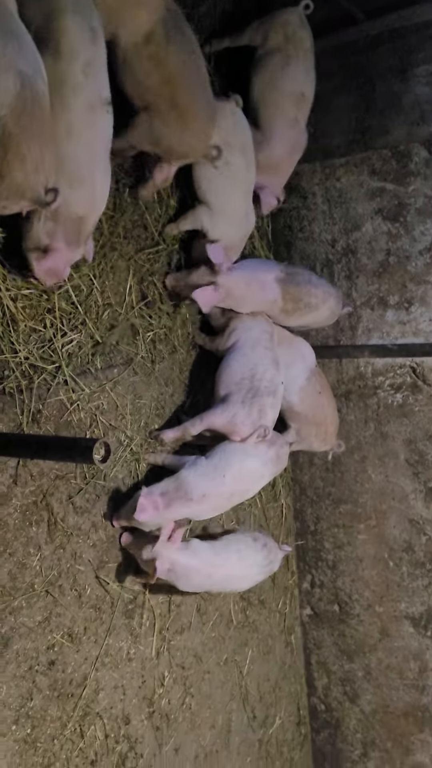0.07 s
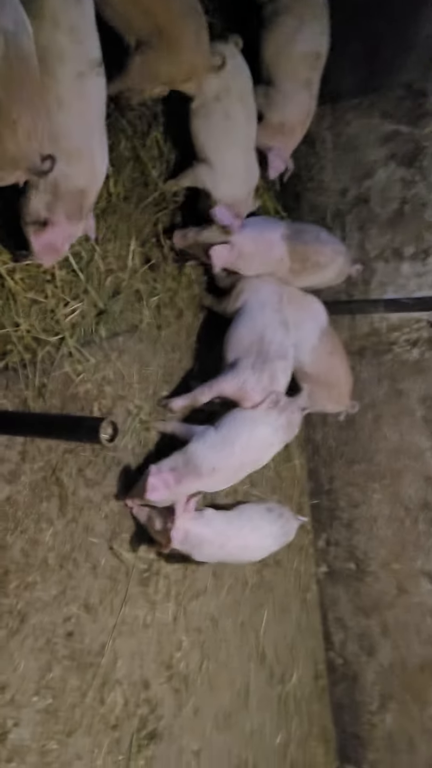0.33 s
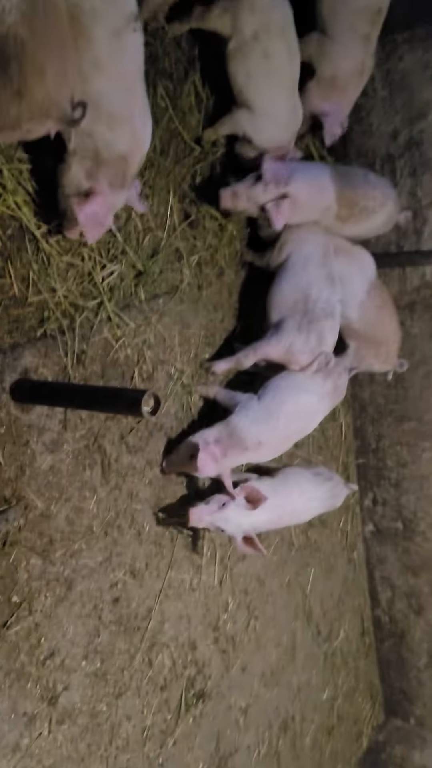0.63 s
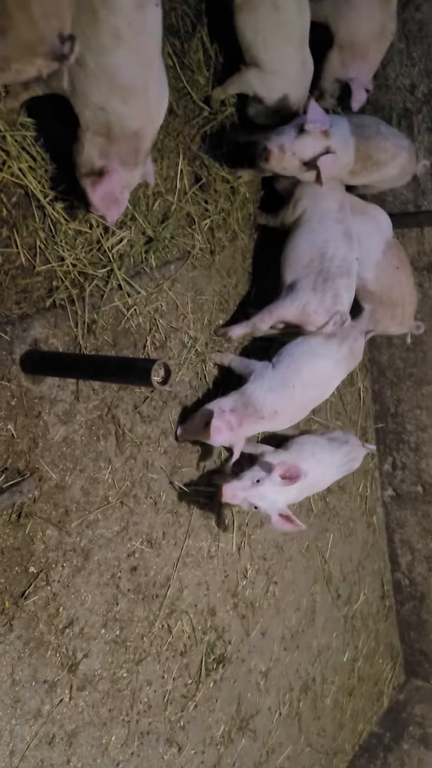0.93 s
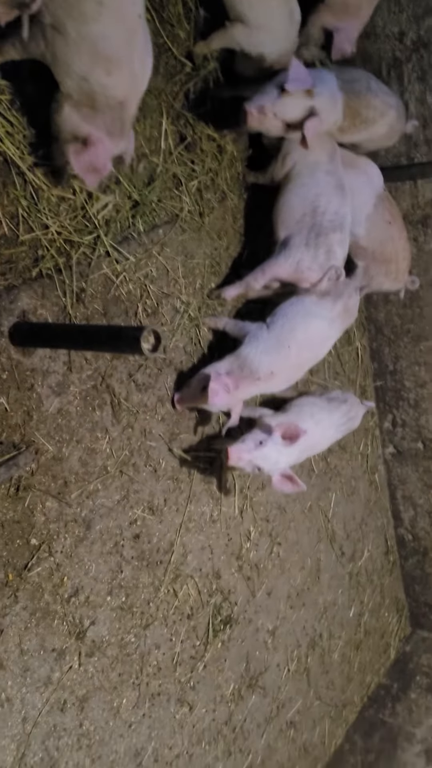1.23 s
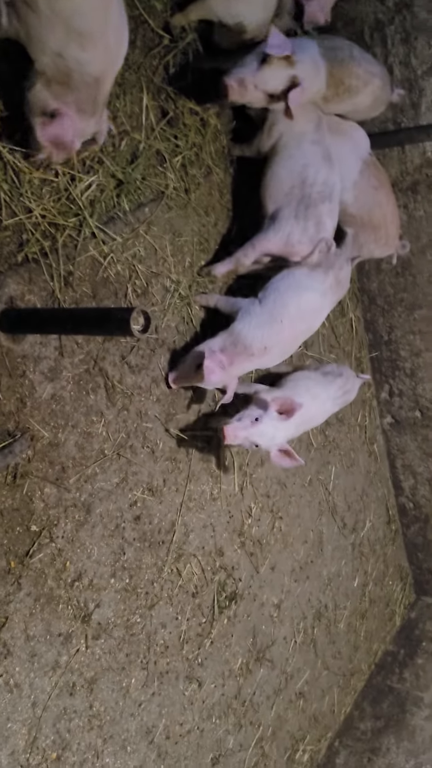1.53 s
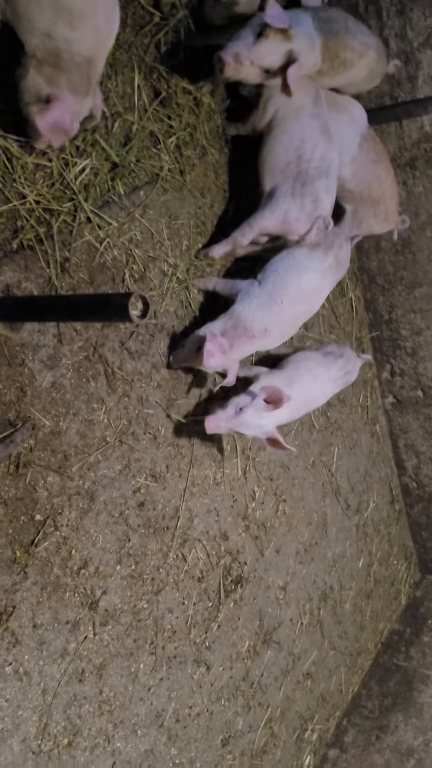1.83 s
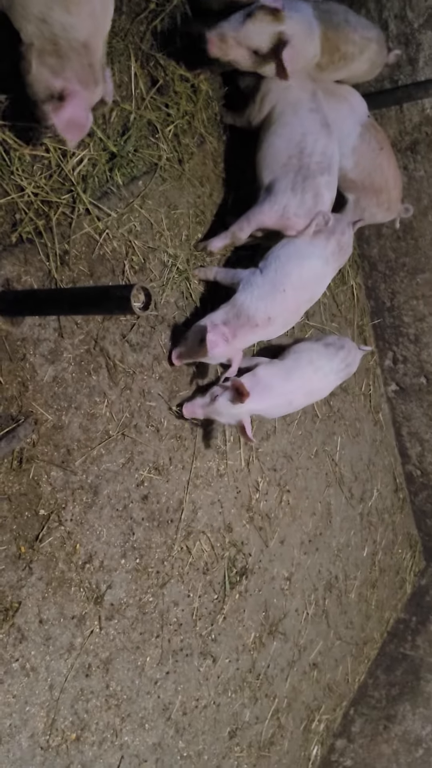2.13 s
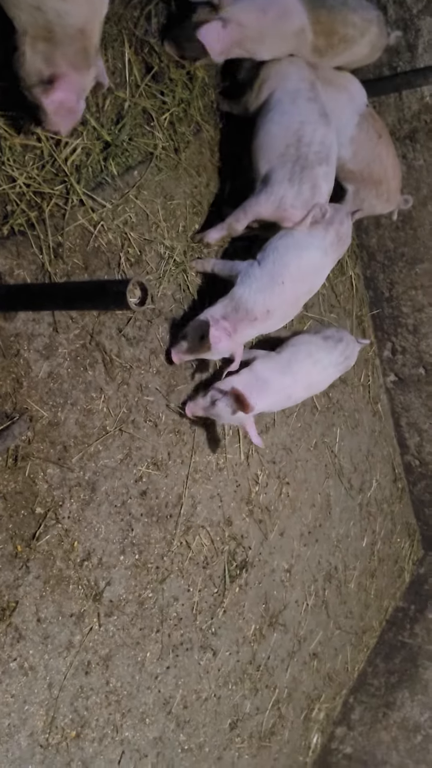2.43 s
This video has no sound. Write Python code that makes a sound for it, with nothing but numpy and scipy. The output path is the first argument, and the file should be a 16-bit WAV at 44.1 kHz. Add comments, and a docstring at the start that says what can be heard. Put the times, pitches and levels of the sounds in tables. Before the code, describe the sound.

Piglets smack their mouths and chew, with faint straw rustling, soft snuffles and a couple of quiet grunts in a concrete pen.

```python
"""In a small concrete pen, piglets doze and root in straw over the faint air noise of a shed.
Wet smacks and chewing excite damped resonances of the mouth; breath drives the nostrils in snuffles,
and pulses from the throat ring the snout in grunts. Stalks fracture, hides rub, and bodies and hooves
bump the floor. The hard walls return these sounds as early reflections and a short reverberation."""
import sys
import numpy as np
from scipy import signal
from scipy.fft import rfft, irfft
from scipy.io import wavfile
from scipy.ndimage import uniform_filter1d

SR = 44100
rng = np.random.default_rng(int(sys.argv[2]) if len(sys.argv) > 2 else 0)


def unload_wav(signal):
    """Save mono or channel-first audio to the path in sys.argv[1] as 16-bit WAV at rate SR, clipped to [-1, 1]."""
    wavfile.write(
        sys.argv[1],
        SR,
        np.round(np.clip(np.atleast_2d(signal).T, -1, 1) * 32767).astype(np.int16),
    )


N = 308259
TIME = np.arange(N) / SR
EVENT_TIME = np.arange(4096) / SR


def undb(db):
    """Decibels to amplitude ratio. Table levels are relative: each source adds its own gain."""
    return 10 ** (np.asarray(db) / 20)

def unit(x):
    """Normalisation to rms 1."""
    return x / np.sqrt(np.mean(x ** 2))

def burst(x):
    """Normalisation of a transient to the energy of 3 ms at rms 1."""
    return x * np.sqrt(.003 * SR / np.sum(x ** 2))

def add(track, s, x):
    """Superposition of x on the track from time s."""
    i = max(int(s * SR), 0)
    track[..., i:i + x.shape[-1]] += x[..., :N - i]

def at_hz(points, hz):
    """Interpolation of (frequency [Hz], value) points on a logarithmic frequency axis."""
    f, v = np.transpose(points)
    return np.interp(np.log(np.maximum(hz, 1)), np.log(f), v)

def colour(x, points):
    """Minimum-phase filter through (frequency [Hz], gain [dB]) points."""
    gain = undb(at_hz(points, np.linspace(0, SR / 2, 2049)))
    cepstrum = irfft(np.log(gain))
    half = len(cepstrum) // 2
    causal = np.r_[cepstrum[0], 2 * cepstrum[1:half], np.zeros(half)]
    return signal.oaconvolve(x, irfft(np.exp(rfft(causal))))[:len(x)]

def resonate(x, hz, width_hz):
    """Second-order resonance with unit gain at its centre."""
    return signal.lfilter(*signal.iirpeak(hz, hz / np.clip(width_hz, 10, 9000), fs=SR), x)

def walk(rate_hz):
    """Random modulation: interpolated Gaussian values with a spread near 1."""
    knots = rng.standard_normal(int(N / SR * rate_hz) + 2)
    return np.interp(TIME * rate_hz, np.arange(len(knots)), knots)

def pan(db):
    """Left and right gains for a level difference, left minus right."""
    return undb(np.array([[db], [-db]]) / 2)

def envelope(s, length_s, attack_s, release_s):
    """Linear attack from time s, then exponential decay once the length is over."""
    attack = np.clip((TIME - s) / attack_s, 0, 1)
    return attack * np.exp(-np.maximum(TIME - s - length_s, 0) / release_s)

def hump(s, half_s):
    """Gaussian rise and fall around time s."""
    return np.exp(-((TIME - s) / half_s) ** 2)

def grains(per_s=2500, spread_db=4.5):
    """Shot noise: many tiny stalk clicks, a few of them much larger."""
    sizes = undb(spread_db * np.minimum(rng.exponential(size=N), 4)) * rng.choice([-1, 1], N)
    return (rng.random(N) < per_s / SR) * sizes

def crackle(decay_s, impulse=0.46):
    """Rupture: one impulse and an exponentially dying spray of smaller ones."""
    spray = rng.standard_normal(len(EVENT_TIME)) * np.exp(-EVENT_TIME / decay_s)
    return spray + impulse * np.sqrt(np.sum(spray ** 2)) * (EVENT_TIME == 0)

def pop(hz, width_hz, rise_s=0.0027):
    """Damped oscillator, radiating as the rate of change of its flow."""
    ring = np.sin(2 * np.pi * hz * EVENT_TIME) * np.exp(-np.pi * width_hz * EVENT_TIME)
    onset = 1 - np.exp(-EVENT_TIME / rise_s)
    return burst(np.gradient(ring * onset))

def faint(typical, per_s, spread=0.035):
    """Jittered sequence: one event row in each time slot, scattered about the typical values."""
    chance = rng.uniform(-1, 1, (64, 1 + len(typical)))[:int(N / SR * per_s)]
    return [((slot + (1 + c[0]) / 2) / per_s, *(np.array(typical) * (1 + spread * c[1:])))
            for slot, c in enumerate(chance)]


# air noise spectrum: (frequency [Hz], level [dB])
SHED_SPECTRUM = [(25, -36), (120, -11.5), (260, -5.5), (350, 2.5), (460, 1), (620, -7.5), (900, -8.5),
                 (1500, -18), (2150, -6.5), (2700, -14), (4900, -17.5), (7500, -18.5), (8700, -29),
                 (16000, -16)]

def shed(level_db=-54, coherent_hz=900, waver_db=1):
    """Diffuse air noise: long wavelengths reach both sides alike."""
    mid, side = (colour(rng.standard_normal(N), SHED_SPECTRUM) for _ in range(2))
    side = signal.sosfilt(signal.butter(1, coherent_hz, "high", fs=SR, output="sos"), side)
    return unit(mid + side * np.array([[1], [-1]])) * undb(level_db + waver_db * walk(rate_hz=9.1))


# spectra of crackling straw, swept straw and rubbing hides: (frequency [Hz], level [dB])
STRAW_SPECTRUM = [(400, -6.5), (1000, 7), (2200, 11), (3200, -5), (5000, 6), (7000, -9), (8700, -6.5),
                  (11000, 5), (16000, 1)]
SWISH_SPECTRUM = [(800, -9), (2200, 3.5), (3200, -4), (5000, 0.5), (7000, -2), (8700, -4.5), (11000, 3.5),
                  (16000, -2.5)]
HIDE_SPECTRUM = [(25, -16), (60, -7.5), (120, -4.5), (170, 0.5), (300, 0.5), (480, -2), (900, -6.5),
                 (2000, -62.5)]
# body movements: (centre time [s], half length [s], straw level [dB], hide level [dB])
STIRS = [(0.122, 0.19, -56, -61), (.46, 0.4, -55, -55), (0.98, 0.074, -51, -66), (1.47, 0.4, -55.5, -60.5),
         (2.227, 0.01, -48, -56), (2.386, 0.059, -50.5, -55), (2.4, 0.31, -56.5, -61),
         (3.31, 0.16, -64, -57.5), (3.63, .05, -57, -74), (4.088, 0.27, -56, -68), (4.457, 0.053, -47, -71),
         (4.734, 0.08, -49.5, -57.5), (4.904, 0.11, -54.5, -64), (5.184, 0.042, -50, -58),
         (5.525, 0.1, -53, -48), (6.22, 0.34, -57, -63), (6.654, 0.48, -59, -70)]

def bedding(rest_straw_db=-65.5, rest_hide_db=-65, swish_half_s=0.052):
    """Friction noises add in power: hides rub, and straw crackles in slow stirs, swishes in quick ones."""
    slow, quick, rubbing = undb(rest_straw_db) ** 2, 0, undb(rest_hide_db) ** 2
    for s, half_s, straw_db, hide_db in STIRS:
        motion = hump(s, half_s)
        quickness = 1 / (1 + (half_s / swish_half_s) ** 4)
        straw_power = (undb(straw_db) * motion) ** 2
        slow += (1 - quickness) * straw_power
        quick += quickness * straw_power
        rubbing += (undb(hide_db) * motion) ** 2
    catches = undb(2.5 * walk(rate_hz=28))
    straw = unit(colour(grains(), STRAW_SPECTRUM)) * np.sqrt(slow) * catches
    swish = unit(colour(grains(), SWISH_SPECTRUM)) * np.sqrt(quick)
    slips = undb(2 * walk(rate_hz=14))
    hides = unit(colour(rng.standard_normal(N), HIDE_SPECTRUM)) * np.sqrt(rubbing) * slips
    return (straw + swish) * undb(-3.5), hides * undb(-6)


# breath spectrum: (frequency [Hz], level [dB])
BREATH_SPECTRUM = [(120, -3), (330, 2.5), (900, -1), (2000, -8.5), (5000, -12)]
# breaths: (time [s], level [dB], length [s], nostril resonance [Hz], bandwidth [Hz])
SNUFFLES = [(-.025, -36, 0.023, 660, 163), (3.79, -47.5, .07, 477, 700), (3.9, -44, 0.1, 500, 650),
            (4.861, -41.5, 0.083, 610, 640)]

def snuffles(flutter_db=3):
    """Turbulent breath excites the resonance of fluttering nostrils."""
    out = np.zeros(N)
    for s, db, length_s, hz, width_hz in SNUFFLES:
        air = rng.standard_normal(N) * undb(flutter_db * walk(rate_hz=90))
        breath = unit(colour(resonate(air, hz, width_hz), BREATH_SPECTRUM))
        out += breath * undb(db) * envelope(s, length_s, attack_s=0.0083, release_s=0.023)
    return out * undb(-4.5)


# rupture spectrum of saliva and stalks: (frequency [Hz], level [dB])
CRACK_SPECTRUM = [(550, -15), (950, 8), (2200, 4), (3000, -2), (4000, 0.5), (5200, -1), (7000, 0.5),
                  (8500, -5), (16000, -58)]
# soft bites: (time [s], level [dB], cavity resonance [Hz], wet crack level [dB], decay time [s])
CHEWS = [(0.065, -40.5, 2280, -29, 0.0022), (.326, -36.5, 2100, -11, 0.0078),
         (.33, -33.5, 1190, -20, 0.0076), (0.489, -44, 1480, -24, 0.0073),
         (1.117, -41.5, 2650, -27, 0.00092), (1.603, -41.5, 2110, -20, 0.0034),
         (1.641, -43, 1600, -18, .0042), (1.868, -41.5, 2020, -7, 0.0021), (2.353, -37.5, 2180, -7, .008),
         (2.621, -44.5, 2150, -5, 0.0017), (2.663, -42.5, 1210, -24, 0.0058),
         (3.12, -45, 1150, -21, 0.0042), (3.595, -43, 1290, -11, 0.0045), (3.669, -44, 1780, -9, .004),
         (3.807, -41.5, 1940, -13, 0.0072), (3.869, -40.5, 1850, -17, 0.0017),
         (4.511, -36.5, 1520, -14, 0.0036), (4.571, -35, 2000, -13, 0.0026),
         (4.832, -40, 1410, -12, 0.0043), (5.037, -45.5, 2010, -22, 0.0023),
         (5.254, -40.5, 1760, -12, 0.0046), (5.687, -37, 1510, -10, 0.0056), (5.776, -43, 1540, -1.5, .003),
         (6.1, -40.5, 1370, -20, 0.0029), (6.136, -33, 1250, -21, 0.0037),
         (6.174, -30.5, 1310, -30, 0.0046), (6.234, -37.5, 1820, -5, 0.0044),
         (6.828, -38.5, 1650, -12.5, 0.0023)]

def chews():
    """Forced resonance: a ragged spray of wet clicks drives the mouth cavity; long bites build slowly."""
    out = np.zeros(N)
    for s, db, hz, crack_db, decay_s in CHEWS + faint((-49.5, 2000, -1, 0.02), per_s=2.2):
        decay_s = np.clip(decay_s, .001, .02)
        ragged = np.repeat(undb(9.2 * rng.standard_normal(len(EVENT_TIME) // 64)), 64)
        onset = 1 - np.exp(-EVENT_TIME / (0.44 * decay_s))
        spray = crackle(decay_s, impulse=0) * ragged * onset
        mouth = burst(resonate(resonate(spray, hz, width_hz=260), hz, width_hz=2500))
        crack = burst(colour(spray, CRACK_SPECTRUM))
        add(out, s, undb(db - 4.5) * (mouth + undb(crack_db + 3) * crack))
    return out


# bodies and hooves landing: (time [s], level [dB], frequency [Hz])
BUMPS = [(0.149, -37, 104), (.359, -38, 237), (.407, -31, 118), (.58, -32.5, 290), (.62, -31, 266),
         (2.378, -35.5, 264), (4.323, -32.5, 183), (4.475, -37, 110), (4.519, -42, 150), (5.268, -34, 64.6),
         (5.398, -30.5, 72.7), (5.439, -36, 61.9), (5.499, -40, 237)]

def bumps():
    """Soft impacts on concrete excite a low, heavily damped oscillation."""
    out = np.zeros(N)
    for s, db, hz in BUMPS:
        add(out, s, undb(db - 10.5) * pop(hz, width_hz=80))
    return out

def rumble(bump_gain=0.33 * undb(-14.5), rest_db=-82):
    """Amplitude modulation: low noise, uncorrelated between the sides, swells with every bump."""
    swells = sum(undb(db) * hump(s, half_s=0.042) for s, db, _ in BUMPS)
    spectrum = [(20, -34), (45, -17), (75, -10.5), (130, -20), (300, -25), (900, -67)]
    sides = np.array([unit(colour(rng.standard_normal(N), spectrum)) for _ in range(2)])
    return sides * (bump_gain * swells + undb(rest_db))


# fizz spectrum of the finest ruptures: (frequency [Hz], level [dB])
FIZZ_SPECTRUM = [(4000, -34), (8500, -2.5), (10500, 13), (13000, 10), (16000, 5.5)]
# breaking straws: (time [s], level [dB], fizz level [dB])
SNAPS = [(0.244, -34, -30), (.456, -38.5, -25), (1.505, -38, -25), (2.029, -31.5, -11.5),
         (2.101, -41.5, -9), (2.799, -39.5, -8), (2.938, -40.5, -15), (3.28, -40, -18), (4.3245, -31, -4.5),
         (5.1022, -40, -5), (5.492, -36, -9.5), (6.335, -40, -9)]

def snaps(stalk_hz=5000, width_hz=4900):
    """Brittle fracture excites the broad resonance of a dry stalk, with a bright fizz."""
    out = np.zeros(N)
    for s, db, fizz_db in SNAPS + faint((-49, -4), per_s=3.6):
        fracture = colour(crackle(decay_s=0.0053), CRACK_SPECTRUM)
        stalk = burst(resonate(fracture, stalk_hz, width_hz))
        fizz = burst(colour(crackle(decay_s=0.0015), FIZZ_SPECTRUM))
        add(out, s, undb(db) * (undb(-10.5) * stalk + undb(fizz_db) * fizz))
    return out


# mouth smacks: (time [s], level [dB], main cavity [Hz], bandwidth [Hz], second cavity [Hz],
# wet crack level [dB], crack cutoff [Hz], fizz level [dB], jaw thump level [dB],
# left minus right [dB], direct sound level [dB])
SMACKS = [(.560, -31.5, 2200, 1180, 1040, -1, 6400, -12, -3, 15, 0.5),
          (.680, -17.5, 1134, 380, 2060, 2, 6800, -10.5, -29, 6, 3),
          (.970, -28, 1424, 354, 1840, -6.5, 7100, -5, -17.5, 11, 2),
          (1.376, -37, 1220, 400, 2160, 6, 4760, -6, -9, 4, 5.5),
          (3.3084, -15.5, 1936, 268, 1950, -13, 7200, -18, -27, -3.5, 7.5),
          (3.3893, -19.5, 1600, 254, 1830, -3.5, 5060, -13.5, -25, -1, 6.5),
          (4.203, -27.5, 1170, 397, 2070, 8, 9700, 4, -3, -0.5, 5.5),
          (5.325, -29, 1890, 500, 904, 1, 6500, -12, -1, 1, 4.5),
          (5.452, -33, 1370, 180, 1870, -2.5, 6700, -9, -20, -6, 3.5),
          (5.716, -22, 1460, 249, 1760, -8.5, 7500, -17, -20.5, 2, -0.5),
          (5.850, -16.5, 1770, 520, 1460, -4, 4800, -19, -13, -.5, 5),
          (6.43, -17, 1064, 300, 1305, -4.5, 5800, -33, -29, -1, -4.5),
          (6.747, -33, 1346, 397, 1080, -2, 6730, -8.5, -14, -2, 5),
          (6.89, -30.5, 933, 218, 2790, -4, 5530, -26, -13, -2, 5)]

def smacks():
    """Free oscillation of two mouth cavities as tongue and lips part; saliva cracks, the jaw thumps."""
    out = np.zeros((2, N))
    for (s, db, hz, width_hz, second_hz, crack_db, cutoff_hz,
         fizz_db, thump_db, pan_db, direct_db) in SMACKS:
        cavities = pop(hz, width_hz) + undb(-4.5) * pop(second_hz, width_hz=360)
        wet = signal.sosfilt(signal.butter(5, cutoff_hz, fs=SR, output="sos"), crackle(decay_s=.002))
        crack = undb(crack_db) * burst(colour(wet, CRACK_SPECTRUM))
        fizz = undb(fizz_db) * burst(colour(crackle(decay_s=.0012), FIZZ_SPECTRUM))
        thump = undb(thump_db) * pop(hz=380, width_hz=150)
        smack = undb(db - 12.5) * np.pad(cavities + crack + fizz + thump, (0, SR // 3))
        direct = smack * undb(direct_db) * pan(pan_db)
        reflected = undb(9.5) * pen(smack * pan(0.27 * pan_db))  # each smack takes its own paths
        add(out, s, direct + reflected)
    return out


# grunts, a soft start and then a push: (time [s], level [dB], push delay [s], push gain [dB])
GRUNTS = [(1.266, -38.5, 0.074, 6), (5.25, -38.5, 0.088, 10.5)]
# snout resonances, one list for each grunt: (frequency [Hz], bandwidth [Hz], level [dB])
SNOUT_MODES = [
    [(136, 60, -2.5), (277, 194, 3), (520, 85, 7.5)],
    [(150, 88, -3), (380, 230, 3.5), (500, 42, -13)],
]

def grunts(flap_hz=85, jitter=.25, roughness=0.68, hold_s=0.033):
    """Source and filter: slow, uneven flaps of the throat excite the modes of the closed snout."""
    cycles = np.cumsum(flap_hz * np.exp(jitter * walk(rate_hz=76))) / SR
    flaps = np.diff(np.floor(cycles), prepend=0)
    air = rng.standard_normal(N) * np.exp(-(cycles % 1) / 0.14)  # one puff with each flap
    throat = unit(flaps) + roughness * unit(air)
    out = np.zeros(N)
    for (s, level_db, push_s, push_db), modes in zip(GRUNTS, SNOUT_MODES):
        voice = sum(undb(db) * resonate(resonate(throat, hz, width), hz, width)
                    for hz, width, db in modes)
        running_rms = np.sqrt(np.abs(uniform_filter1d(voice ** 2, size=1800)) + 1e-12)
        effort = undb(level_db + push_db * hump(s + push_s, half_s=0.011))
        gate = envelope(s, push_s + hold_s, attack_s=.016, release_s=0.0067)
        out += voice / running_rms * effort * gate
    return out * undb(-2.5)


# decay of the pen: (frequency [Hz], reverberation time T60 [s])
PEN_DECAY = [(150, 0.21), (500, 0.34), (1300, 0.3), (2500, 0.23), (5000, 0.28), (9000, 0.29),
             (15000, 0.095)]

def pen(x, first_s=.002, coherent_hz=750, early_db=4, early_s=0.058):
    """Reverberation: distinct early reflections off concrete merge into a short exponential tail."""
    t = np.arange(16384) / SR
    scatter = rng.standard_normal((2, len(t)))
    scatter *= undb(early_db * np.exp(-t / early_s) * rng.standard_normal(len(t)).clip(-2, 2))
    mid, side = rfft(scatter)
    hz = np.linspace(0, SR / 2, len(mid))
    side_share = hz ** 2 / (hz ** 2 + coherent_hz ** 2) / 2
    stereo = mid * np.sqrt(1 - side_share) + side * np.sqrt(side_share) * np.array([[1], [-1]])
    centres_hz, t60s = np.transpose(PEN_DECAY)
    tail = 0
    for t60, weights in zip(t60s, np.eye(len(t60s))):
        band = at_hz(np.c_[centres_hz, weights], hz)
        tail += irfft(stereo * band) * np.exp(-np.log(1000) * t / t60)
    tail *= t > first_s
    tail /= np.sqrt(np.sum(tail ** 2) / 2)
    return signal.fftconvolve(x, tail, axes=1)[:, :x.shape[1]]


def scene():
    """Superposition of the direct sounds, their reflections and the background noise."""
    straw, hides = bedding()
    voices = grunts() * pan(db=-3)
    bodies = (snuffles() + bumps() + hides) * pan(db=3)
    rooting = (chews() + straw) * pan(db=1)
    stalks = snaps() * pan(db=0.5)
    walls = pen(undb(-4) * voices + undb(3.5) * bodies)
    walls += undb(4) * pen(rooting) + undb(2.5) * pen(stalks)
    return smacks() + voices + bodies + rooting + stalks + walls + rumble() + shed()

def record(dry, cutoff_hz=16200):
    """Frequency response: two microphone ports colour the sound differently before a steep low-pass."""
    left = colour(dry[0], [(500, -1), (2000, -2.5), (5000, 1), (9000, -5.5), (13000, 1)])
    right = colour(dry[1], [(500, 2.5), (700, -1.5), (2000, 7), (5000, 5.5), (9000, 5), (13000, -3.5)])
    low_pass = signal.ellip(10, .2, 70, cutoff_hz, fs=SR, output="sos")
    return signal.sosfilt(low_pass, np.array([left, right]))


dry = scene()
out = record(dry)
unload_wav(out)
```